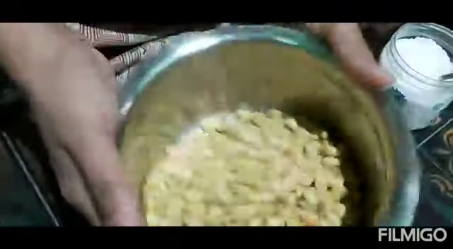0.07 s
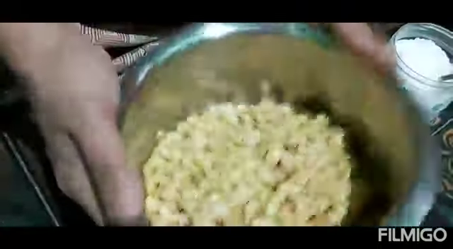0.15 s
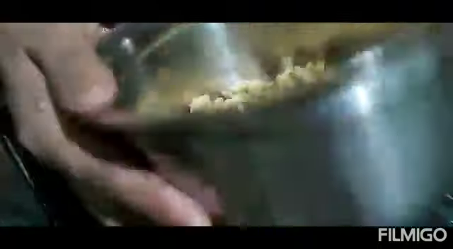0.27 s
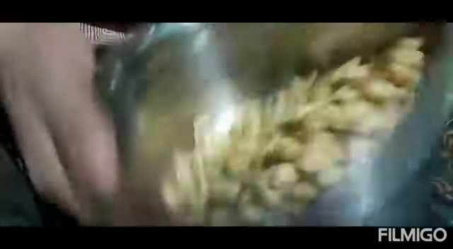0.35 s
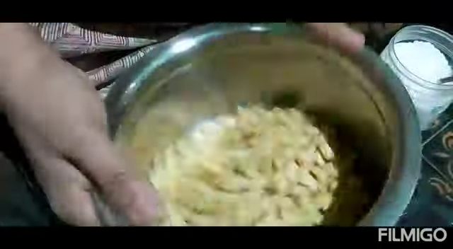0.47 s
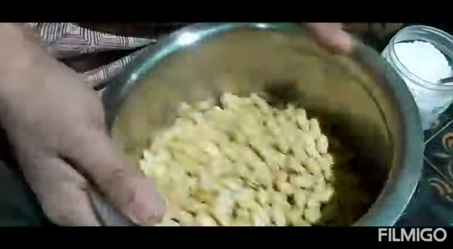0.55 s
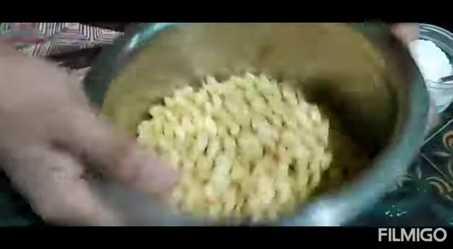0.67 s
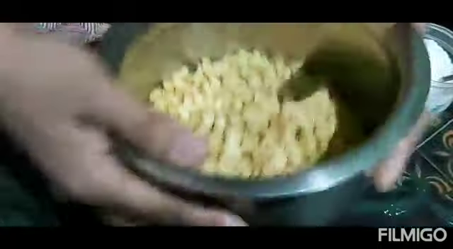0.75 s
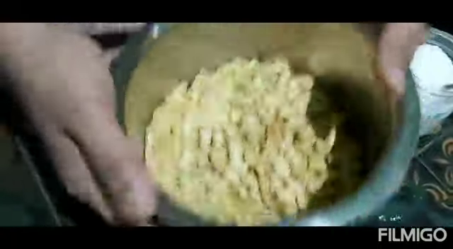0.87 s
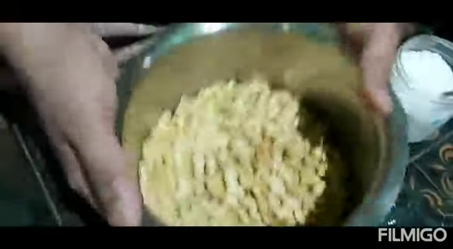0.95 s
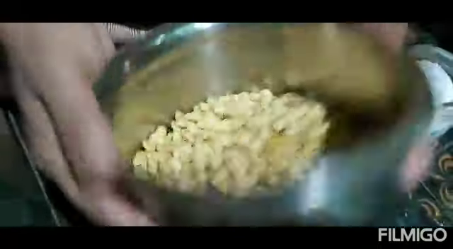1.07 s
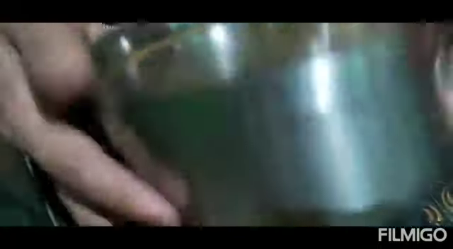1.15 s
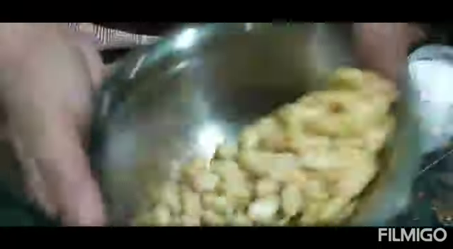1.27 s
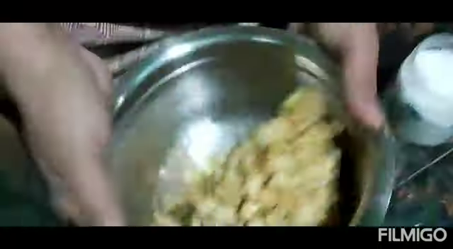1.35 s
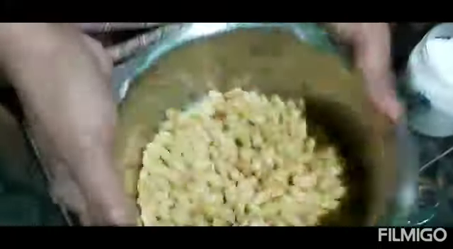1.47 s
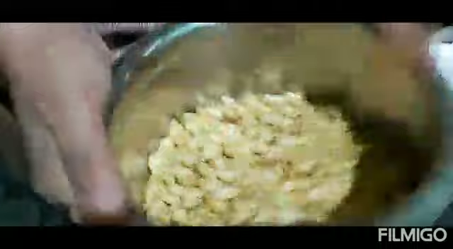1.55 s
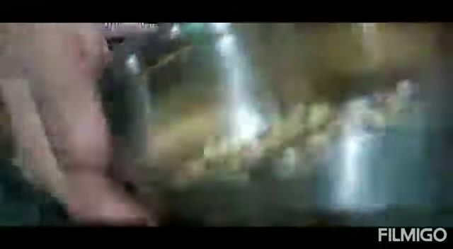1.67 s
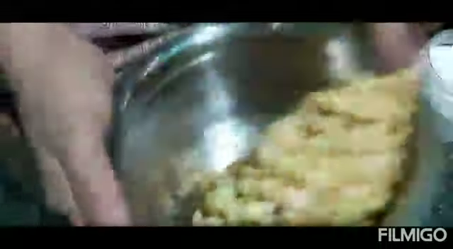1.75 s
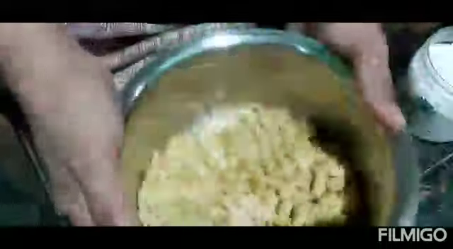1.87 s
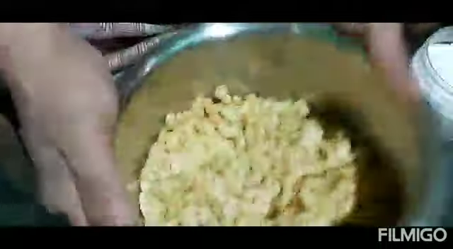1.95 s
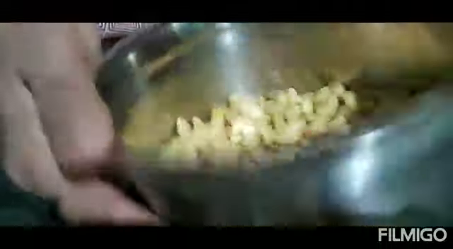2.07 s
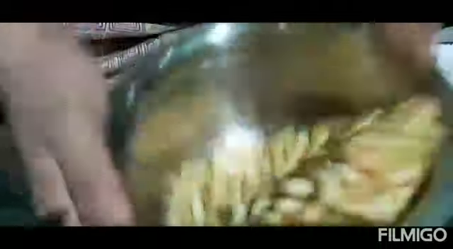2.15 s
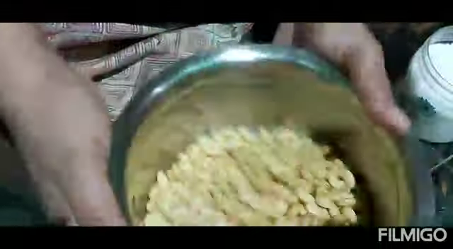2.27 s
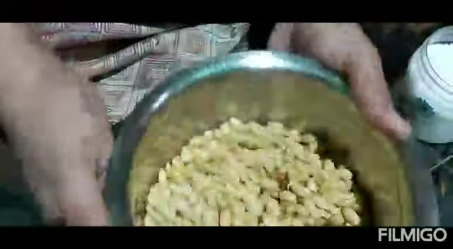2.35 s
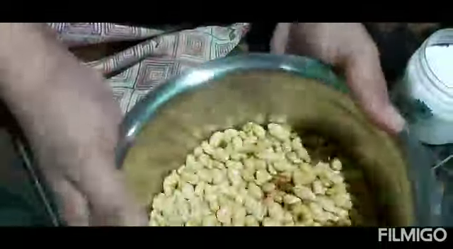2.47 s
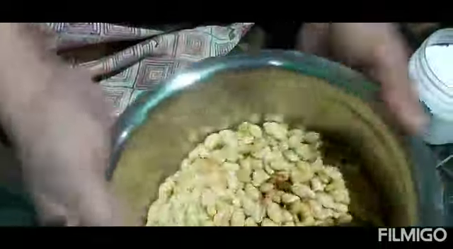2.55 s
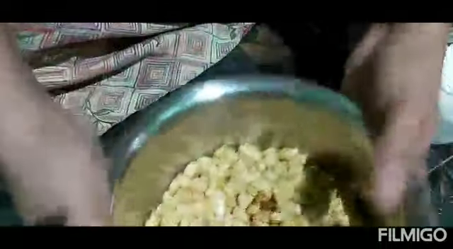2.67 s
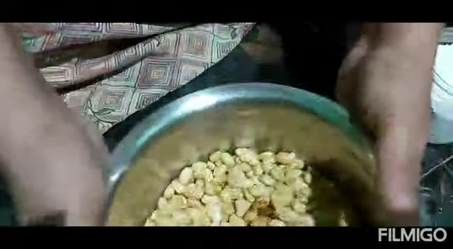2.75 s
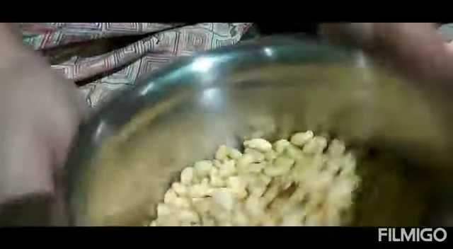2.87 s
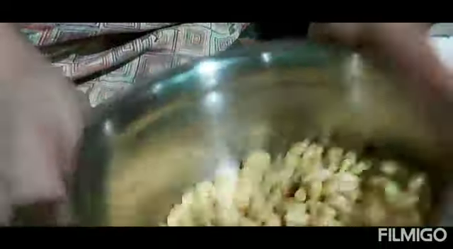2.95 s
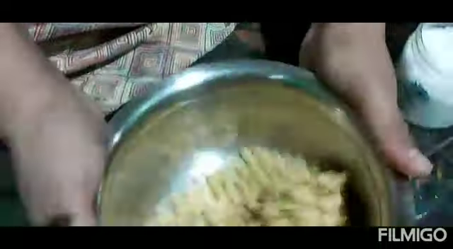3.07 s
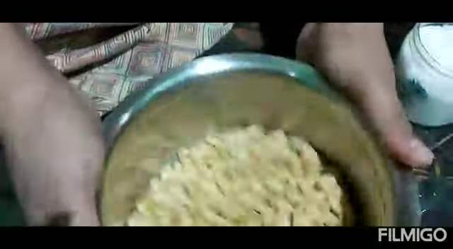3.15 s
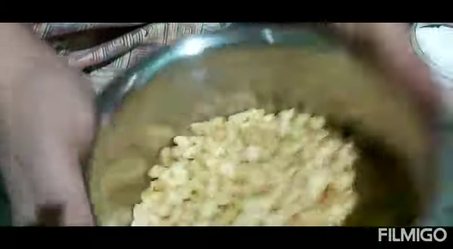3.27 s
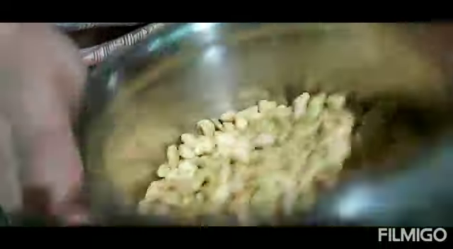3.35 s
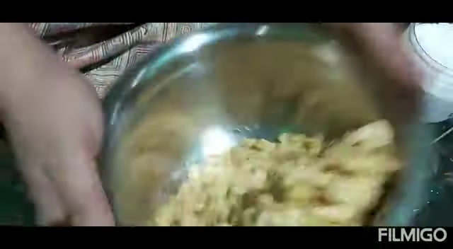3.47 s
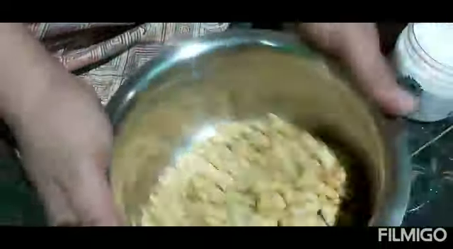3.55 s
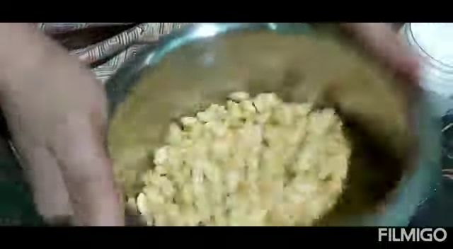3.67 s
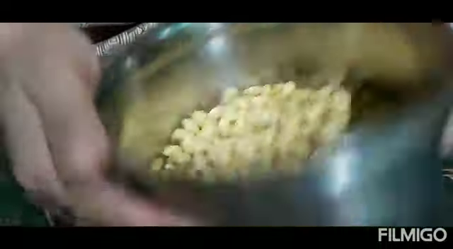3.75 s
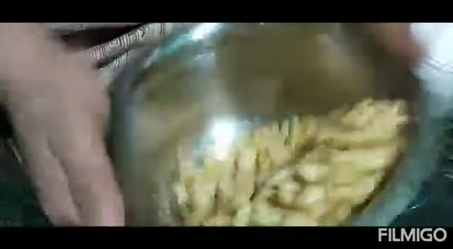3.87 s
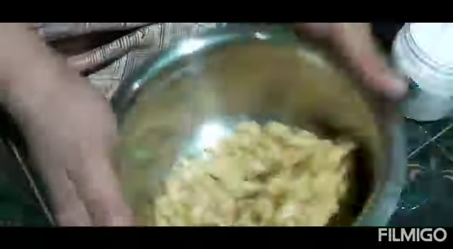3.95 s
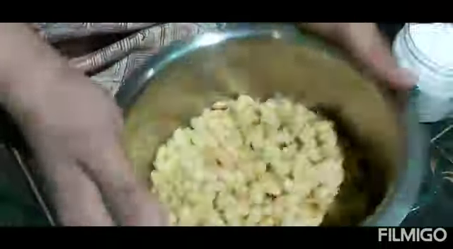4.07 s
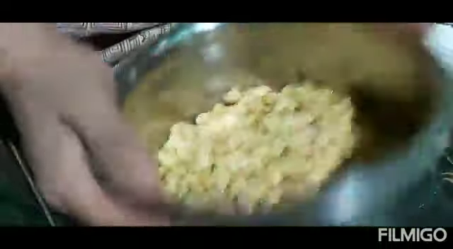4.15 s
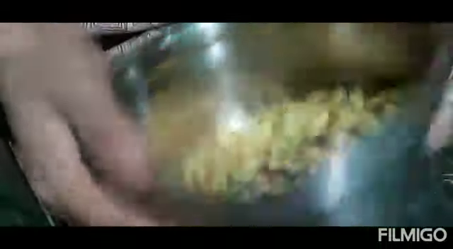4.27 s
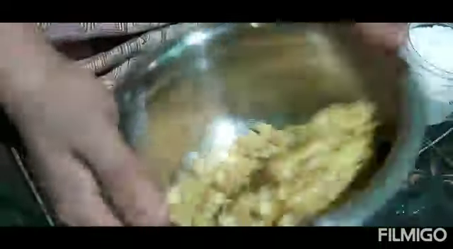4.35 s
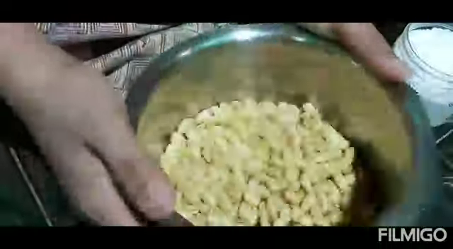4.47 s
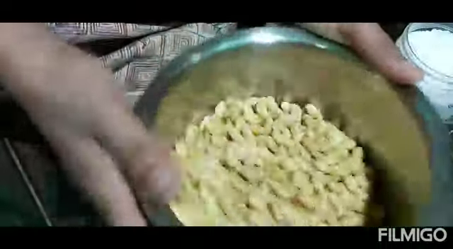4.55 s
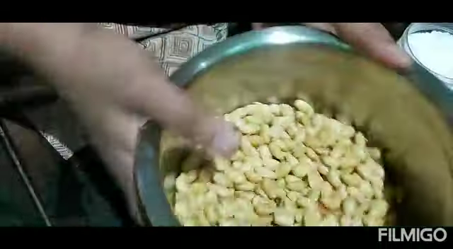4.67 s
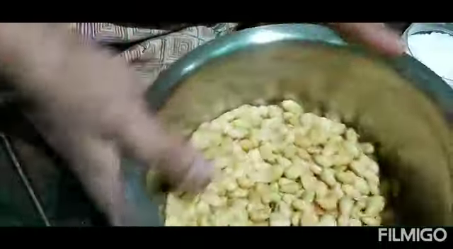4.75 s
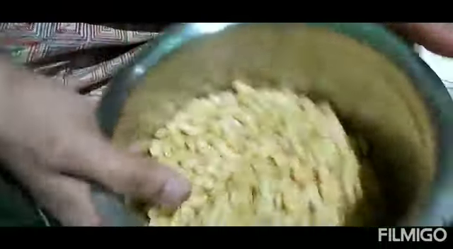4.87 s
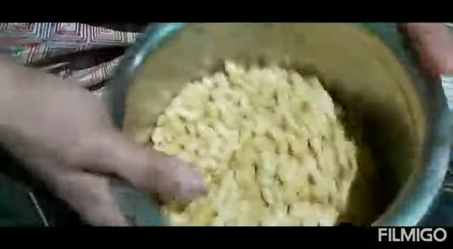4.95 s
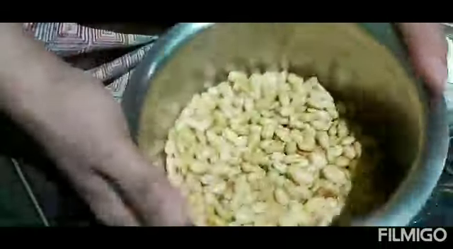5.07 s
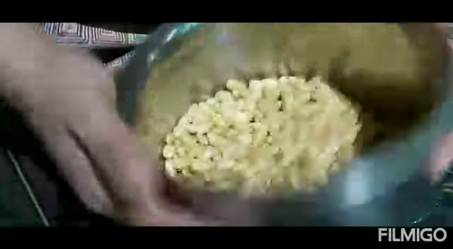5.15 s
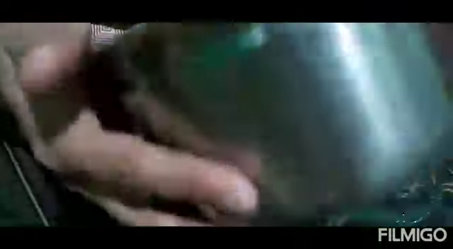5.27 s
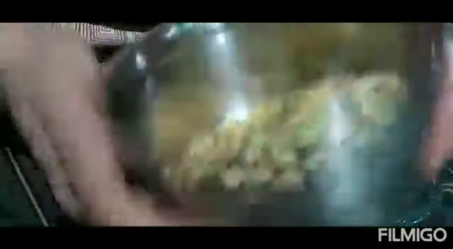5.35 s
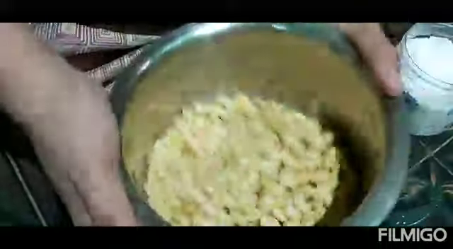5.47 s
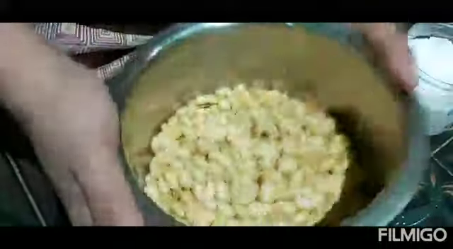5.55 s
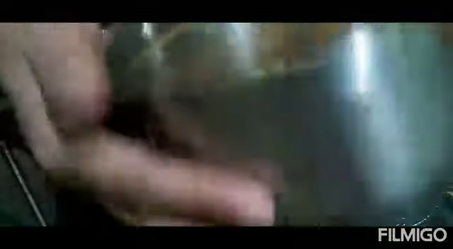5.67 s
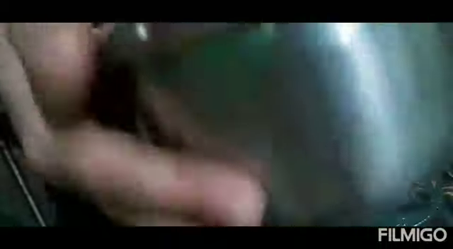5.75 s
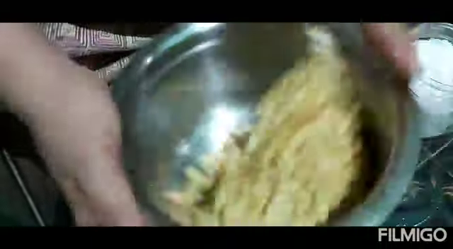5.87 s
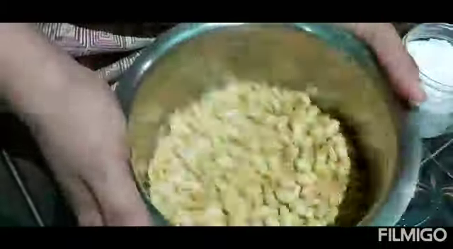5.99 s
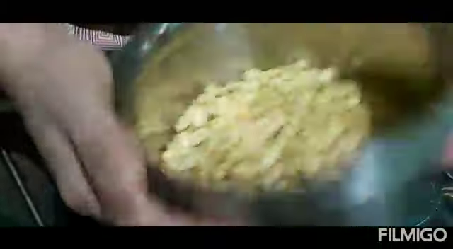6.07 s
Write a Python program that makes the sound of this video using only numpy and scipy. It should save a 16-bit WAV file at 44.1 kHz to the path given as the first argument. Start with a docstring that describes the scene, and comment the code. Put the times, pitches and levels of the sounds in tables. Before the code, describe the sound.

Close to the microphone in a small, quiet kitchen, someone shakes fried beans in a steel bowl. The beans slide, drum on the base and crash back into a pile, with bright ringing ticks from stragglers. The tosses come about two a second in four groups, separated by short lulls holding only faint sliding, soft hollow knocks and fingers rubbing on the metal.

```python
"""Small kitchen: fried beans tossed in a hand-held stainless steel bowl, four short runs with pauses.
Each toss skates up the wall, drums on the bared base and crashes back into a pile; tiny random impacts
ring the steel's modes. Stragglers clink on the wall; hands bump and rub the bowl in between.
The room rings briefly around a close pair of microphones."""
import sys
import numpy as np
from scipy import signal
from scipy.fft import rfft, irfft
from scipy.io import wavfile

SR = 44100
rng = np.random.default_rng(int(sys.argv[2]) if len(sys.argv) > 2 else 0)


def unload_wav(signal):
    """Save mono or channel-first audio to the path in sys.argv[1] as 16-bit WAV at rate SR, clipped to [-1, 1]."""
    wavfile.write(
        sys.argv[1],
        SR,
        np.round(np.clip(np.atleast_2d(signal).T, -1, 1) * 32767).astype(np.int16),
    )


N = 269892
T = np.arange(N) / SR
HZ = np.maximum(np.fft.rfftfreq(8192, 1 / SR), 1)

# tosses: landing t/s, pour/s, thud level/dB, shell level/dB, settling/(dB/s),
# slide lead/s, slide level/dB, drum f/Hz, drum level/dB, rasp level/dB
TOSS_EVENTS = [(0.166, 0.055, -18.5, -14.5, 162, 0.12, -43, 1363, -28, -31),
               (0.571, 0.043, -19.5, -13.5, 145, .083, -36, 1346, -23, -30.5),
               (1.485, 0.043, -18, -13, 122, 0.099, -30, 1434, -22.5, -26),
               (1.924, 0.031, -18.5, -14.5, 114, 0.079, -34.5, 1422, -21, -22),
               (2.345, 0.047, -20, -15, 140, 0.084, -34, 1414, -31.5, -24.5),
               (3.185, 0.047, -18.5, -14, 132, 0.086, -34, 1407, -30.5, -19),
               (3.645, 0.037, -19.5, -16.5, 146, 0.076, -33.5, 1440, -27, -21),
               (4.061, 0.042, -20.5, -14, 136, 0.073, -34.5, 1410, -32, -22.5),
               (4.486, .036, -22.5, -17.5, 131, 0.069, -35.5, 1442, -30.5, -33),
               (5.559, .048, -20, -14, 177, 0.067, -44.5, 1380, -26, -22),
               (6.008, 0.05, -20, -16, 71, 0.095, -36.5, 1480, -18.5, -27)]
# pile slips as the bowl is levelled: mid t/s, half length/s, thud level/dB, shell level/dB, wall level/dB
SLIP_EVENTS = [(0.683, 0.095, -37.5, -29.5, -32.5), (0.945, .11, -45.5, -42, -55),
               (1.216, 0.043, -54.5, -72, -74.5), (2.011, 0.11, -25, -21, -30),
               (2.44, 0.1, -38, -29.5, -44), (3.303, 0.04, -31, -29, -35), (3.825, 0.11, -45.5, -36.5, -37),
               (4.639, 0.17, -47, -38, -34.5)]
# free steel wall, modes: f/Hz, width/Hz, level/dB
WALL_MODES = [(4240, 230, -5.5), (4270, 30, 3.5), (4580, 36, -8), (6030, 160, -7.5), (6573, 65, 1),
              (6900, 66, 1), (6980, 200, -5), (8470, 31, -1.5), (8710, 73, -1.5), (9980, 92, -9),
              (10720, 95, -3), (11350, 67, 2), (11500, 63, -3), (13860, 300, -27.5)]
# free steel wall, broad spectrum: f/Hz, level/dB
WALL_SPECTRUM = [(200, -55.5), (650, -20.5), (3200, -32), (4100, -17), (5200, -33.5), (6500, -17),
                 (11000, -11), (16000, -15.5)]
# bean shell contacts, broad spectrum: f/Hz, level/dB
SHELL_SPECTRUM = [(400, -64.5), (2000, -29.5), (3200, -14.5), (4000, -8), (5000, -10), (8000, -6.5),
                  (12500, -7), (14500, -8), (15700, -22.5)]


def pile(thud_db=-1, crisp_db=-1, clump_db=1.7, thud_lag_s=0.00015):
    """Falling mass: dull blows through the loaded bowl and crisp shell contacts, in clumps."""
    thud_spectrum = [(150, -71), (380, -57.5), (500, -30.5), (620, -13.5), (1400, -2.5), (2300, -4),
                     (2950, -3), (3200, -13), (4000, -13), (7000, -44.5)]  # dull blows: f/Hz, level/dB
    low_modes = [(602.5, 46, -3.5), (681, 20, -3), (755.5, 38, -4.5), (889, 5.5, -16.5), (1036, 22, -1),
                 (1070, 20, -14.5), (1162, 7.1, -3.5), (1305, 27, -2.5), (1420, 13, 0.5), (1518, 25, 4.5),
                 (1606, 55, -3), (1826, 32, -8), (1960, 15, -4.5), (2050, 60, -4.5), (2220, 27, -10.5),
                 (2605, 130, -6), (2720, 100, -6), (3444, 120, -2), (3836, 32, 0)]  # loaded bowl under dull blows: f/Hz, width/Hz, level/dB
    high_modes = [(4356, 260, -7), (4496, 47, -1.5), (4770, 170, -8), (5450, 100, -4), (5720, 180, -5.5),
                  (6480, 31, -2), (6794, 90, 1.5), (7150, 110, -3.5), (7900, 180, -3), (8210, 100, -0.5),
                  (8700, 60, -12), (9420, 190, -3.5), (10130, 60, -5.5), (11300, 72, -6), (11400, 27, -9.5),
                  (11350, 140, -10), (10950, 81, 1)]  # loaded bowl under shell contacts: f/Hz, width/Hz, level/dB
    clumps = undb(clump_db * walk(260))
    weight, crispness = pile_motion()
    dull = unit(contacts(4000, 3.95, thud_lag_s))
    dull += undb(-5) * unit(pings(598, 4033, 0.0097, count=4400, samples=900, scatter_db=3.5,
                                  lag_s=thud_lag_s))
    sharp = unit(contacts(7000, 4))
    sharp += undb(-8) * unit(pings(3394, 15500, 0.0048, count=8000, samples=480, scatter_db=-1))
    thud = strike(dull, weight * clumps, shape(thud_spectrum, low_modes))
    crisp = strike(sharp, crispness * clumps, shape(SHELL_SPECTRUM, high_modes))
    return thud * undb(thud_db) * pan(-0.2) + crisp * undb(crisp_db) * pan(-2.5)


def pile_motion(creep_db=-14.5, creep_shell_db=-3.5, shell_lag_s=0.011):
    """Envelopes of dull blows and shell contacts: creep during the slide, landings, later slips."""
    creep = slide_envelope()
    weight, crispness = undb(creep_db) * creep, undb(creep_shell_db) * creep
    for s, pour_s, thud_db, shell_db, settle, *_ in TOSS_EVENTS:
        weight += undb(thud_db) * landing(s, pour_s, settle, first_db=-11, tumble_db=-3.5)
        # beans hit beans just after they hit the steel
        crispness += undb(shell_db) * landing(s + shell_lag_s, pour_s, settle, first_db=-9.5, tumble_db=-6)
    for s, half_s, thud_db, shell_db, _ in SLIP_EVENTS:
        slip = swell(s, half_s)
        weight = np.maximum(weight, undb(thud_db) * slip)
        crispness = np.maximum(crispness, undb(shell_db) * slip)
    return weight, crispness


def landing(s, pour_s, settle_db_per_s, first_db, tumble_db,
            arrival_db_per_s=849, crash_db_per_s=328.5, rest_s=0.27):
    """Envelope: first beans arrive, the pour swells to a crash at 0 dB, beans tumble on and rest."""
    out, t = np.zeros(N), T[:SR // 2] - 2 * pour_s
    before, after = np.maximum(-t, 0), np.maximum(t, 0)
    rise_db = first_db * before / pour_s - arrival_db_per_s * np.maximum(before - pour_s, 0)
    fall_db = np.maximum(-crash_db_per_s * after, tumble_db - settle_db_per_s * after)
    rest = np.exp(-(after / rest_s) ** 6)
    add(out, undb(rise_db + fall_db) * rest, s - 2 * pour_s)
    return out


def clinks(focus_octaves=0.63, tick=4, tail_db=-20, tail_s=0.037, sing_db=-23.5, sing_t60_s=0.4):
    """Lone beans tick on the wall and chatter briefly, each ringing its own band of modes."""
    hits = [(0.049, -28.5, 7000, 0.0056), (0.116, -16.5, 5600, 0.0017), (0.162, -3, 6900, 0.0059),
            (0.189, -5.5, 10700, 0.015), (0.4543, -29, 6860, 0.0049), (0.6849, -4.5, 10800, 0.0022),
            (0.6983, -4.5, 7040, 0.0055), (0.9498, -19, 6300, 0.0018), (1.403, -19, 6530, 0.0027),
            (1.447, -13.5, 4400, 0.0016), (1.513, -6.5, 10200, 0.01), (1.6141, -0.5, 11900, 0.0027),
            (1.672, -18, 7150, 0.0024), (2.1277, -10.5, 6300, 0.0013), (2.4277, -6, 8600, 0.003),
            (2.4775, -15.5, 11100, 0.0026), (2.4974, -18, 6560, 0.00092), (3.2052, -6.5, 11300, 0.018),
            (3.304, -1, 10340, 0.0027), (3.543, -19.5, 4840, 0.0022), (3.643, -7, 7900, 0.0054),
            (3.7884, -14, 8540, 0.0036), (3.814, -11, 7300, 0.002), (3.954, -14, 5900, 0.0054),
            (3.992, -11.5, 11200, 0.0068), (4.099, -4.5, 11400, 0.0046), (4.4334, -21.5, 4520, 0.0028),
            (4.6106, -14, 6450, 0.0036), (4.6719, -8.5, 7840, 0.0013), (5.5577, -4, 6800, 0.0013),
            (5.5897, -3.5, 10200, 0.0016), (5.7005, -23.5, 10800, 0.0035), (5.7896, -32.5, 7000, 0.0033),
            (6.026, -5.5, 11200, 0.006)]  # bean on wall: t/s, level/dB, band centre f/Hz, chatter/s
    out, t, wall = np.zeros((2, N)), T[:SR // 4], shape(WALL_SPECTRUM, WALL_MODES)
    low_hz, _, low_db = np.array(WALL_MODES)[:3].T[..., None]
    for s, level_db, hz, chatter_s in hits:
        chatter = np.exp(-t / chatter_s) + undb(tail_db) * np.exp(-t / tail_s)
        force = rng.standard_normal((2, len(t))) * chatter
        force[:, 0] += tick
        hit = ring(force, wall / (1 + (np.log2(HZ / hz) / focus_octaves) ** 2))
        # the lowest modes sing on and beat, more so after a duller blow
        cycles = low_hz * t + rng.random((2, len(low_hz), 1))
        modes = undb(low_db - low_db.max()) * np.sin(2 * np.pi * cycles)
        sing = modes.sum(axis=1) * decay(t, sing_t60_s) * (low_hz[0] / hz) ** 2
        add(out, (hit / np.abs(hit).max() + undb(sing_db) * sing) * undb(level_db), s)
    return out * pan(-2.8)


def drumming(rise_s=0.022, fall_s=0.024, lead_s=0.063, rasp_lead_s=0.047, drift_hz=50, flutter_db=3):
    """Beans drum and rasp on the bare base, swelling until the pile lands and damps it."""
    rasp_spectrum = [(1500, -34), (2350, -1), (2800, -3), (3150, -10.5), (3600, -1), (4600, -5.5),
                     (6000, -31.5)]  # beans scraping the base: f/Hz, level/dB
    note, rasp_envelope, t = np.zeros(N, complex), np.zeros(N), T[:SR // 4] - lead_s
    roll = np.exp(-np.maximum(-t / rise_s, t / fall_s))
    note_roll = roll * np.clip(2 * (t + lead_s) / lead_s, 0, 1)
    rasp_roll = roll * np.clip(2 * (t + rasp_lead_s) / rasp_lead_s, 0, 1)
    for s, pour_s, *_, hz, note_db, rasp_db in TOSS_EVENTS:
        start_s = s - 0.44 * pour_s - lead_s
        add(note, undb(note_db) * note_roll * np.exp(2j * np.pi * hz * t), start_s)
        add(rasp_envelope, undb(rasp_db) * rasp_roll, start_s)
    # new blows shift the phase and strength of the ringing
    note = note * np.exp(1j * walk(drift_hz)) * undb(flutter_db * walk(190))
    scratches = pings(2000, 5000, 0.004, count=7000, samples=600, scatter_db=1.5)
    rasp = strike(scratches, rasp_envelope, shape(rasp_spectrum))
    return np.array([note.real, (note * np.exp(-1j)).real]) + rasp


def slides(level_db=-1):
    """Beans skip lightly along the free wall and keep it singing."""
    slips = sum(undb(wall_db) * swell(s, half_s) for s, half_s, _, _, wall_db in SLIP_EVENTS)
    skipping = unit(ring(contacts(550, 2.2), shape(WALL_SPECTRUM, WALL_MODES)))
    return undb(level_db) * (slide_envelope() + slips) * skipping * pan(-1)


def slide_envelope(half_s=0.085):
    """Run up the wall ahead of each landing."""
    return sum(undb(slide_db) * swell(s - lead_s, half_s)
               for s, _, _, _, _, lead_s, slide_db, *_ in TOSS_EVENTS)


def bumps(attack_s=0.0044, sag_per_s=0.15, roughness=0.62, rough_hz=140):
    """Soft hollow knocks, roughened by shifting beans; the note sags as the load settles."""
    knocks = [(0.156, 264, -44.5, 0.23), (.215, 284, -44, 0.09), (0.575, 130, -39, 0.1),
              (0.695, 317, -35.5, 0.047), (0.699, 79, -46, 0.092), (1.516, 203, -18, 0.01),
              (1.611, 170, -37.5, 0.0098), (1.69, 603, -31.5, 0.044), (1.999, 387, -46.5, 0.15),
              (2.365, 330, -45, 0.19), (2.733, 231, -47, 0.24), (3.233, 265.2, -37, 0.33),
              (3.251, 125, -40, 0.3), (3.279, 216, -33, 0.13), (3.297, 92, -38.5, 0.16),
              (4.082, 322, -41.5, 0.11), (4.502, 331, -54, 0.38), (5.632, 270, -51.5, 0.22)]  # hands and pile on the bowl: t/s, f/Hz, level/dB, t60/s
    out, t = np.zeros((2, N)), T[:SR // 3]
    shifting = np.array([walk(rough_hz) + 1j * walk(rough_hz) for _ in range(2)])
    for s, hz, level_db, t60_s in knocks:
        envelope = (1 - np.exp(-t / attack_s)) * decay(t, t60_s)
        flutter = 1 + roughness * shifting[:, int(s * SR):][:, :len(t)]
        note = np.exp(2j * np.pi * hz * t * (1 - sag_per_s * t)) * flutter
        add(out, undb(level_db) * envelope * note.imag, s)
    return out


def fingers(rub_gain_db=6, rustle_gain_db=2):
    """Skin rubs the steel while a few beans settle."""
    grips = [(1.116, 0.48, -63, -60), (2.727, 0.27, -70.5, -58.5), (2.971, 0.19, -87.5, -59.5),
             (3.479, 0.13, -55, -55.5), (4.914, 0.43, -65, -59), (5.1, 0.053, -65.5, -56.5),
             (5.24, .2, -68, -61), (5.458, 0.21, -65.5, -56), (5.847, 0.22, -63.5, -66)]  # finger shifts: mid t/s, half length/s, rub level/dB, rustle level/dB
    rub_spectrum = [(60, -8.5), (150, 0.5), (250, -10.5), (450, -16), (650, 3), (950, -7), (1200, 3.5),
                    (1450, 3), (1600, 1), (1820, 8.5), (2100, -4.5), (4000, -8.5), (8000, -45)]  # skin on steel: f/Hz, level/dB
    rub = unit(ring(contacts(2300, 1.4), shape(rub_spectrum))) * undb(rub_gain_db + 2 * walk(31))
    rustle = unit(ring(contacts(4600, 3), shape(SHELL_SPECTRUM, WALL_MODES))) * undb(rustle_gain_db)
    return sum(swell(s, half_s) * (rub * undb(rub_db) + rustle * undb(rustle_db))
               for s, half_s, rub_db, rustle_db in grips)


def kitchen(x, wet_db=-8, treble_db=-2, split_hz=4500, onset_s=0.0074, t60_s=0.33, treble_t60_s=0.24):
    """Close hard walls: a short dense tail whose treble dies first."""
    t = T[:SR // 2]
    noise = rng.standard_normal((2, len(t)))
    low = signal.sosfilt(signal.butter(2, split_hz, fs=SR, output="sos"), noise)
    high = signal.sosfilt(signal.butter(2, split_hz, "high", fs=SR, output="sos"), noise[::-1])
    onset = 1 - np.exp(-(t / onset_s) ** 2)
    fade, treble_fade = onset * decay(t, t60_s), onset * decay(t, treble_t60_s)
    tail = (low * fade + undb(treble_db) * high * treble_fade) / np.sqrt(np.sum(fade ** 2))
    return x + undb(wet_db) * signal.fftconvolve(x, tail, axes=-1)[:, :N]


def air(level_db=-70, side=0.23):
    """Faint, near-steady room noise."""
    spectrum = [(25, -24), (70, -5), (150, -5), (300, -3), (450, 5), (600, 6), (900, -12), (1700, -14.5),
                (3000, -19.5), (7000, -28.5), (15000, -47)]  # kitchen background: f/Hz, level/dB
    noise = rng.standard_normal(N) + side * rng.standard_normal((2, N))
    return unit(ring(noise, shape(spectrum))) * undb(level_db + 0.7 * walk(3.9))


def contacts(rate_per_s, scatter_db, lag_s=0.00021, spread_s=0.00012):
    """Tiny random impacts; each one's place in the bowl sets its lag at the right microphone."""
    size, place, sign = rng.standard_normal((3, N))
    at = np.flatnonzero(rng.random(N) < rate_per_s / SR)
    blows = np.sign(sign[at]) * undb(scatter_db * np.minimum(size[at], 2))
    late = np.clip(at + np.round((lag_s + spread_s * place[at]) * SR), 0, N - 1).astype(int)
    return np.array([np.bincount(at, blows, minlength=N), np.bincount(late, blows, minlength=N)])


def pings(low_hz, high_hz, decay_s, count, samples, scatter_db, lag_s=0.0002256):
    """Brief steel notes: each bean wakes a different one, its neighbours damp it at once."""
    when, pitch, strength, place = rng.random((count, 4)).T[..., None]
    hz, n = low_hz * (high_hz / low_hz) ** pitch, np.arange(samples)
    fade = undb(scatter_db * np.minimum(-np.log(strength), 3)) * np.exp(-n / SR / decay_s)
    at = ((when * N).astype(int) + n).ravel()
    phase = (2 * np.pi * hz * n / SR).astype(np.float32)
    right_lag_rad = (2 * np.pi * hz * lag_s * (0.5 + place)).astype(np.float32)
    return np.array([np.bincount(at, (fade * np.sin(phase - lag)).ravel(), minlength=N)[:N]
                     for lag in (0, right_lag_rad)])


def strike(blows, envelope, gain):
    """Blows ring a body; the rms follows the envelope."""
    return ring(blows * envelope, gain) / np.std(ring(blows[:, :SR], gain))


def shape(spectrum, modes=()):
    """Gain over HZ: resonances on a broad spectrum."""
    hz, db = np.transpose(spectrum)
    power = undb(np.interp(np.log(HZ), np.log(hz), db)) ** 2
    for centre_hz, width_hz, peak_db in modes:
        power += (undb(peak_db) / (1 + ((HZ - centre_hz) / width_hz) ** 2)) ** 2
    return np.sqrt(power)


def ring(x, gain):
    """Minimum-phase filter: rings after each blow, never before."""
    cepstrum = irfft(np.log(gain + 1e-9))
    half = len(cepstrum) // 2
    cepstrum[1:half] *= 2
    cepstrum[half + 1:] = 0
    response = irfft(np.exp(rfft(cepstrum)))[None, :half]
    return signal.fftconvolve(x, response, axes=-1)[:, :x.shape[-1]]


def walk(rate_hz):
    """Random drift, spread near 1."""
    knots = rng.standard_normal(16384)
    return np.interp(T * rate_hz, np.arange(len(knots)), knots)


def swell(s, half_s):
    """Smooth rise and fall around time s."""
    return np.maximum(1 - ((T - s) / half_s) ** 2, 0) ** 4


def decay(t, t60_s):
    """Fall of 60 dB per t60_s."""
    return np.exp(-np.log(1000) * t / t60_s)


def pan(db):
    """Stereo gains, left over right by db."""
    return undb(np.array([[db], [-db]]) / 2)


def undb(db):
    """Decibels to gain."""
    return 10 ** (np.asarray(db) / 20)


def unit(x):
    """Scale to rms 1."""
    return x / np.sqrt(np.mean(x ** 2))


def add(out, x, s):
    """Mix x into out from time s."""
    i = max(int(s * SR), 0)
    out[..., i:i + x.shape[-1]] += x[..., :max(N - i, 0)]


def scene():
    """The bowl, heard in the kitchen."""
    return kitchen(pile() + slides() + drumming() + clinks() + bumps() + fingers()) + air()


def record(dry, limit=0.85, top_hz=15750):
    """Hard peak limit, then a steep low-pass."""
    lowpass = signal.ellip(10, 0.2, 80, top_hz, fs=SR, output="sos")
    return signal.sosfilt(lowpass, np.clip(dry, -limit, limit))


dry = scene()
out = record(dry)
unload_wav(out)
```